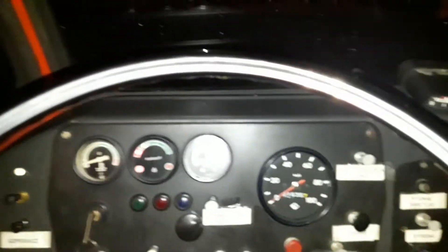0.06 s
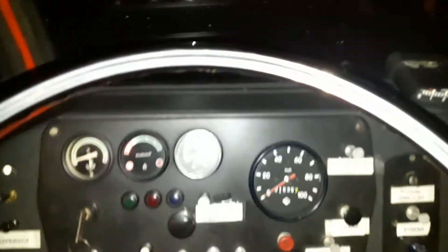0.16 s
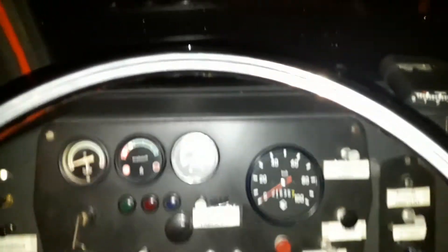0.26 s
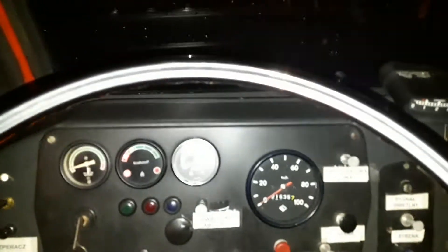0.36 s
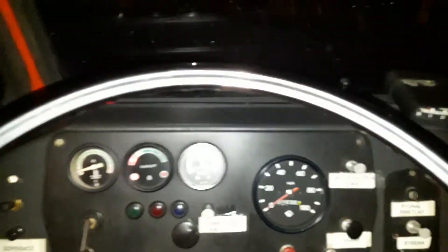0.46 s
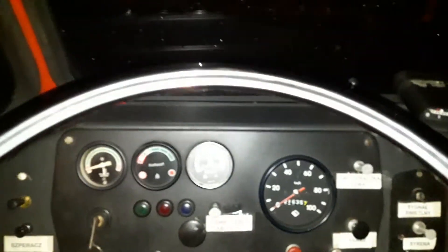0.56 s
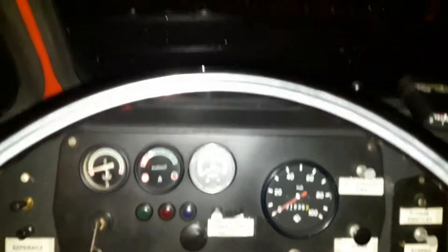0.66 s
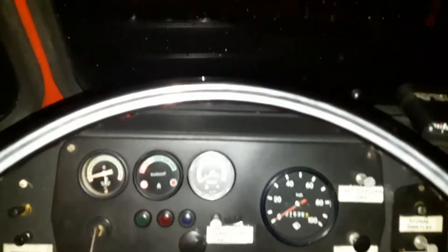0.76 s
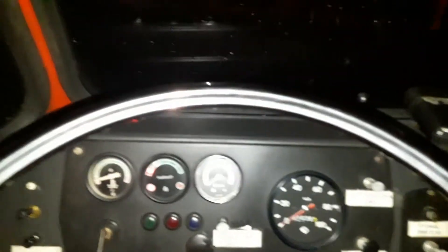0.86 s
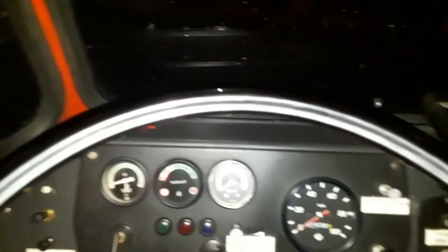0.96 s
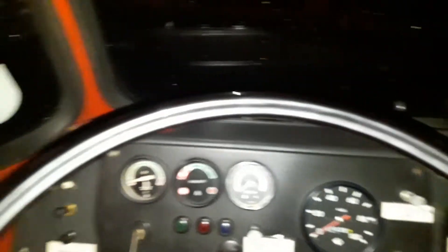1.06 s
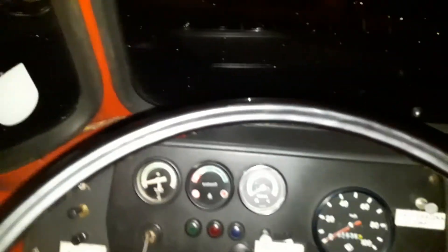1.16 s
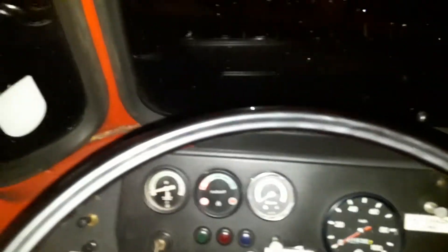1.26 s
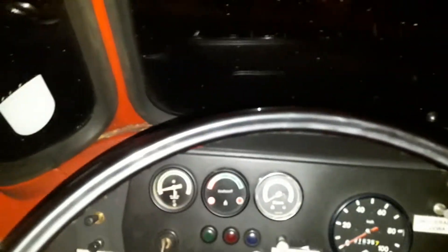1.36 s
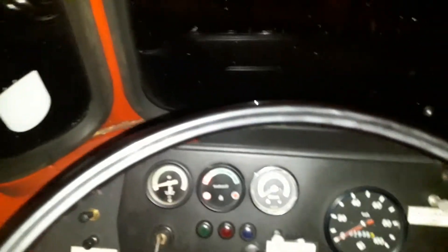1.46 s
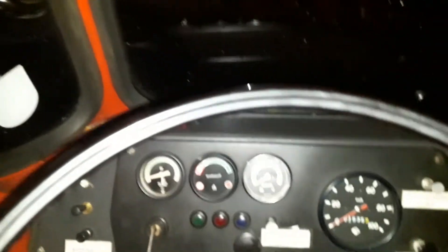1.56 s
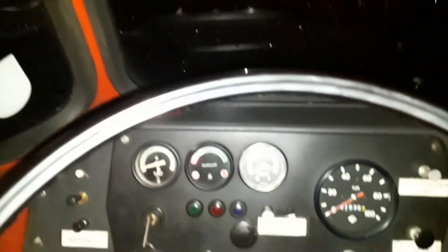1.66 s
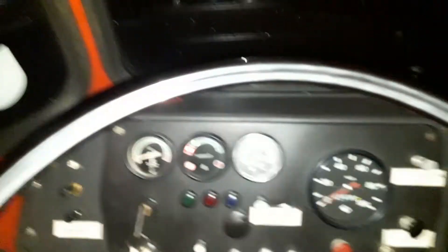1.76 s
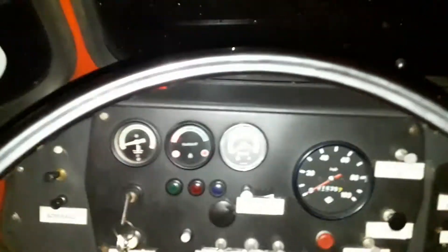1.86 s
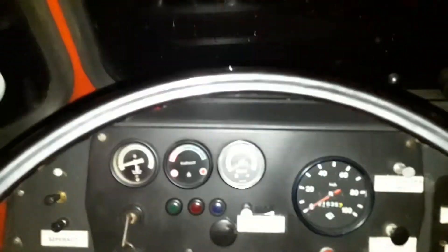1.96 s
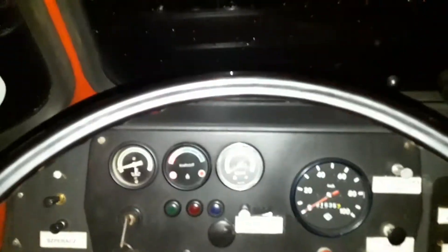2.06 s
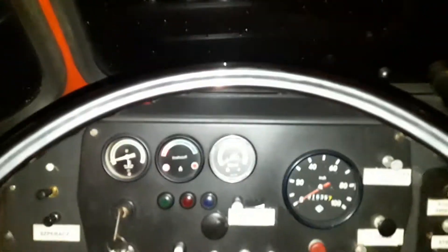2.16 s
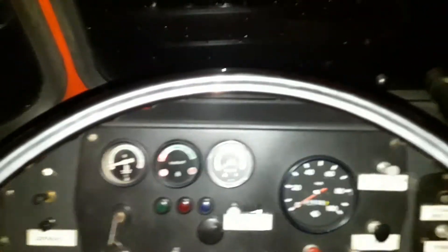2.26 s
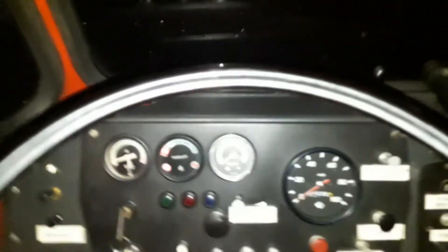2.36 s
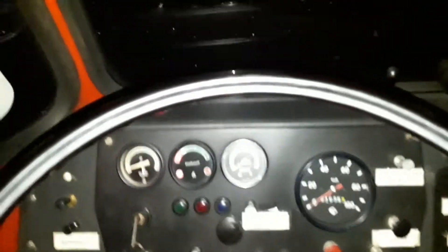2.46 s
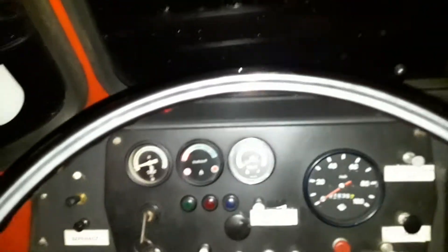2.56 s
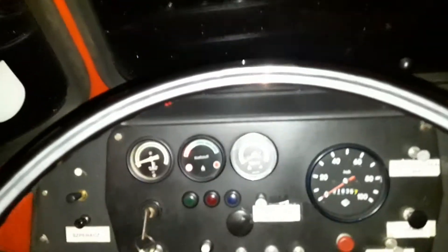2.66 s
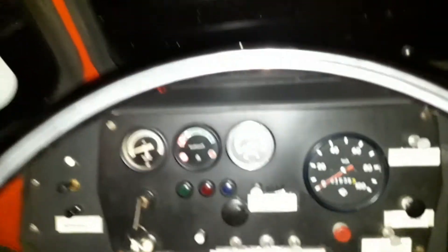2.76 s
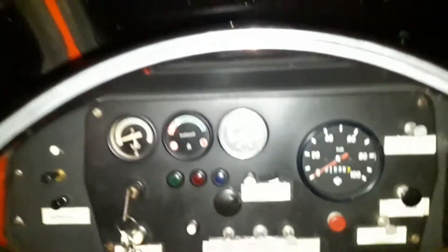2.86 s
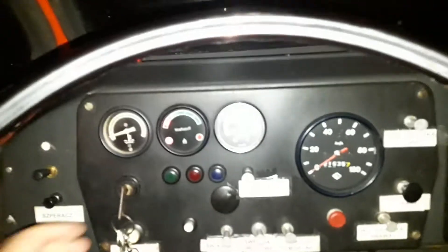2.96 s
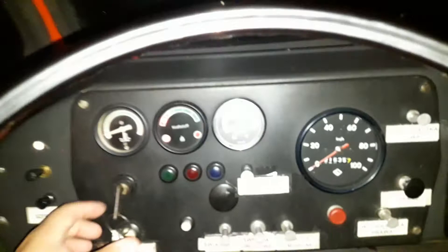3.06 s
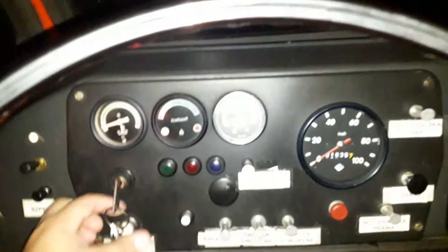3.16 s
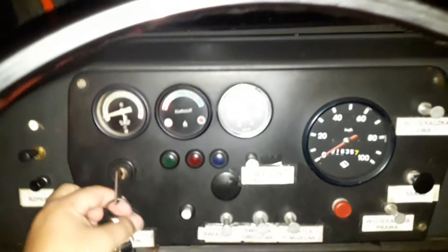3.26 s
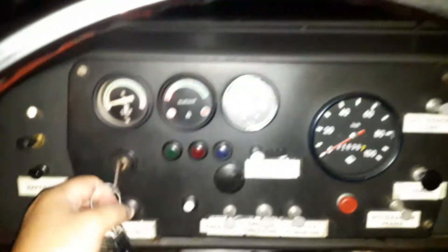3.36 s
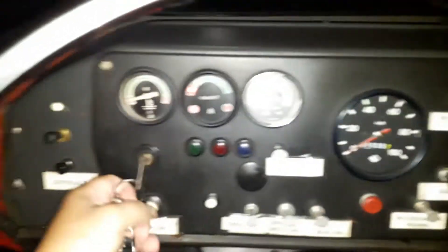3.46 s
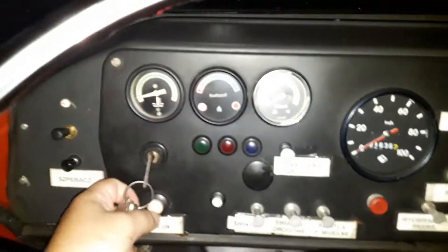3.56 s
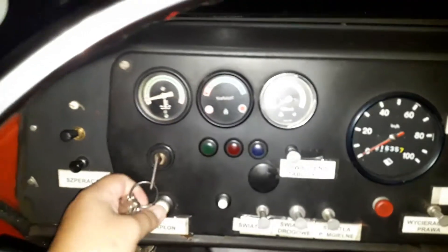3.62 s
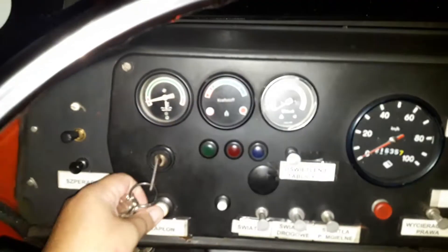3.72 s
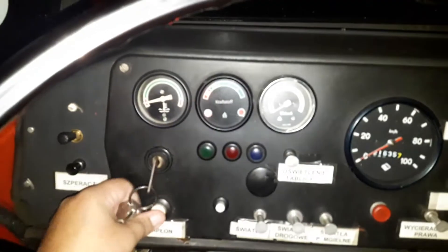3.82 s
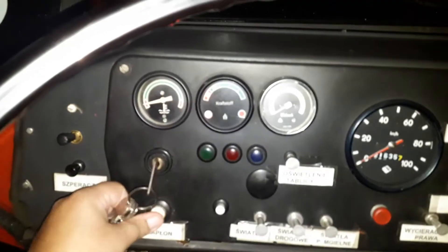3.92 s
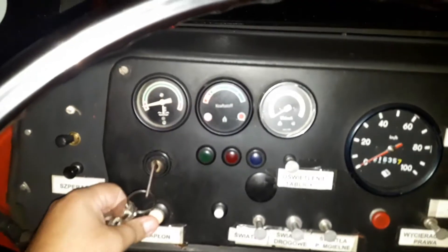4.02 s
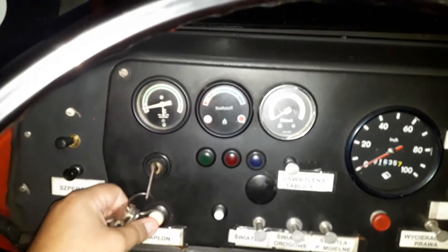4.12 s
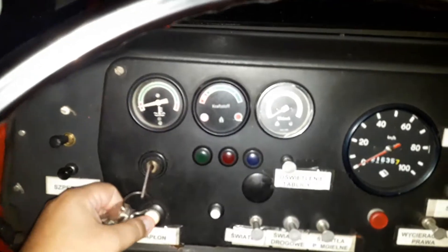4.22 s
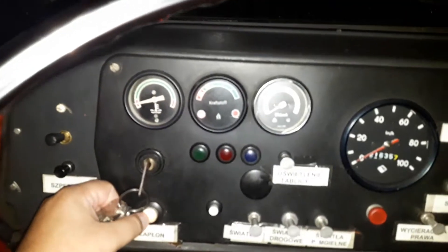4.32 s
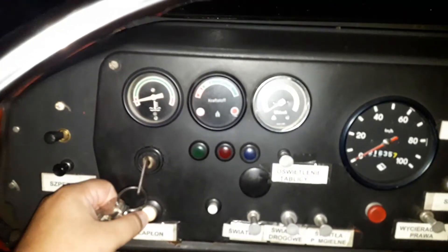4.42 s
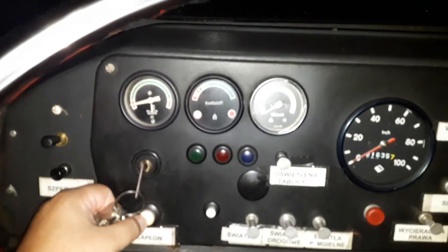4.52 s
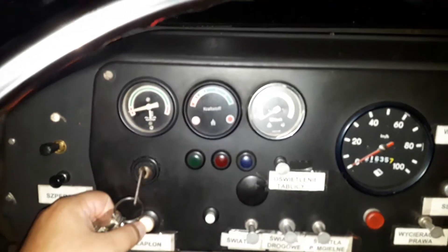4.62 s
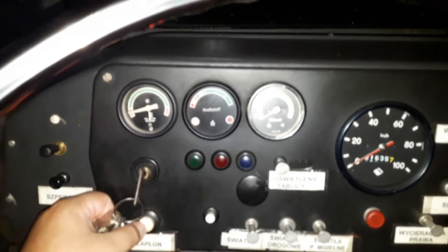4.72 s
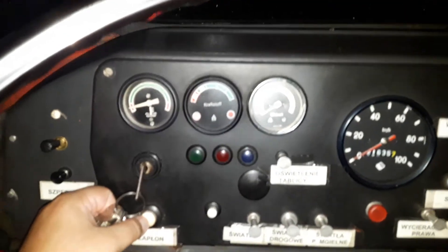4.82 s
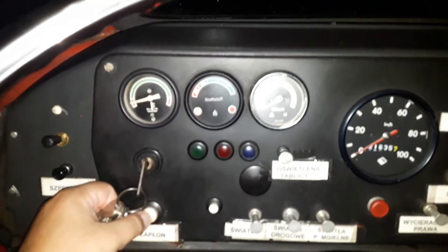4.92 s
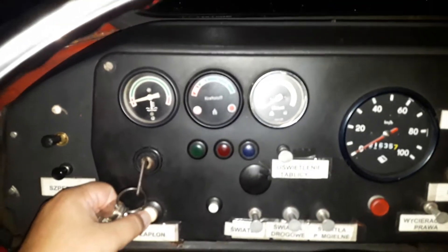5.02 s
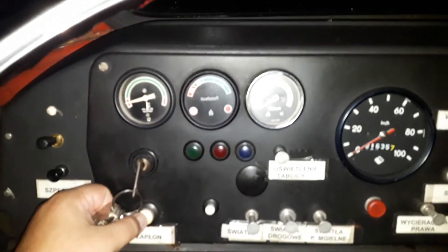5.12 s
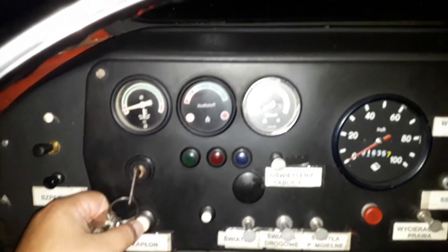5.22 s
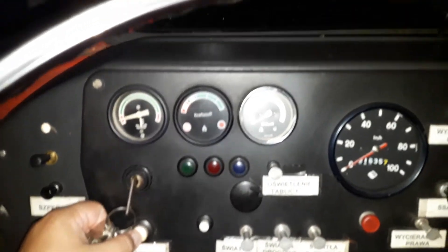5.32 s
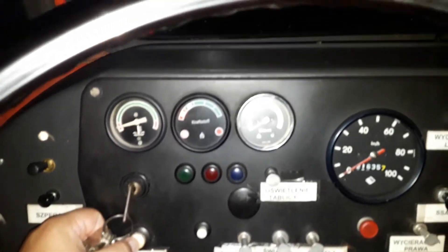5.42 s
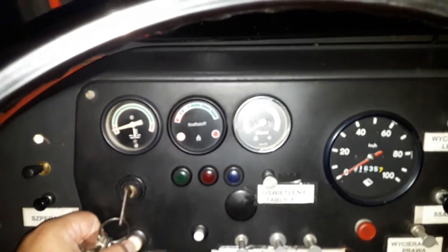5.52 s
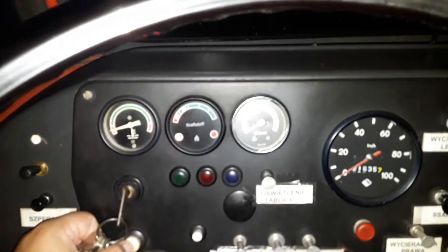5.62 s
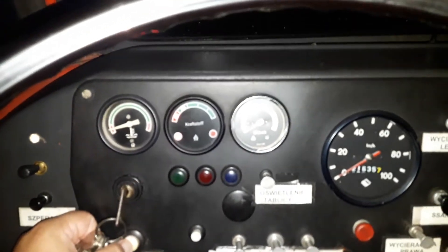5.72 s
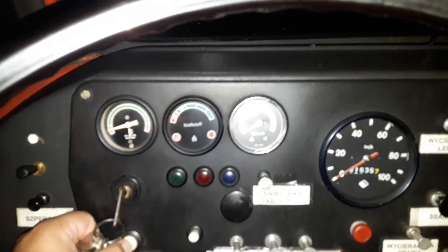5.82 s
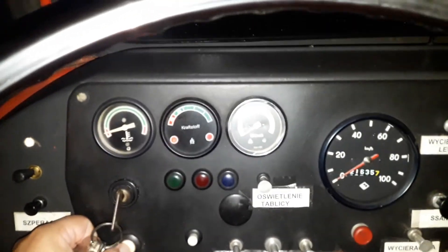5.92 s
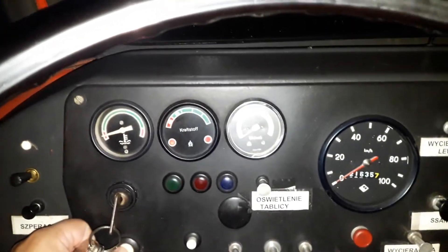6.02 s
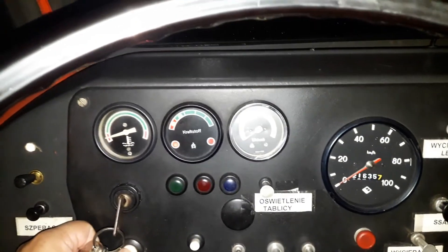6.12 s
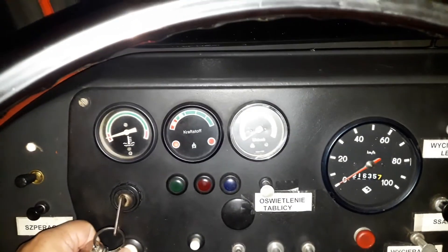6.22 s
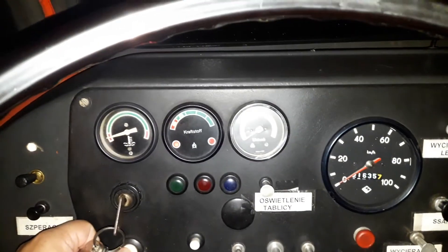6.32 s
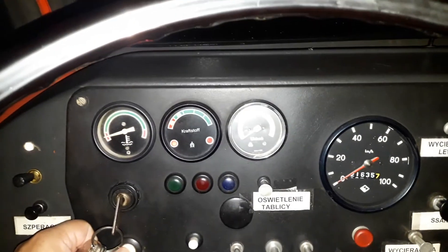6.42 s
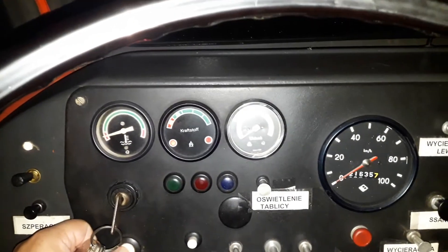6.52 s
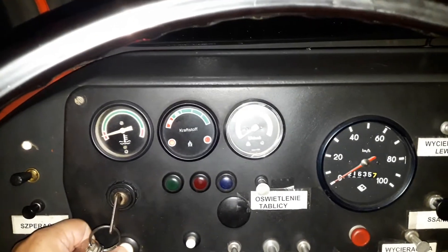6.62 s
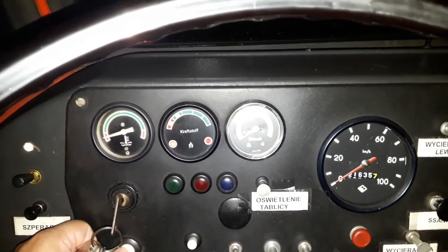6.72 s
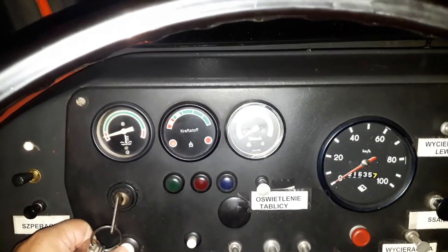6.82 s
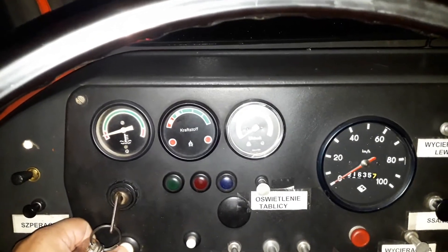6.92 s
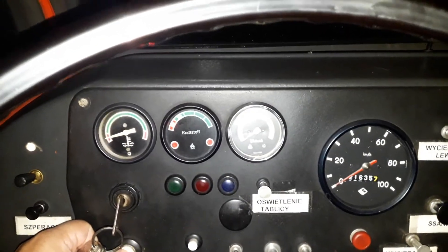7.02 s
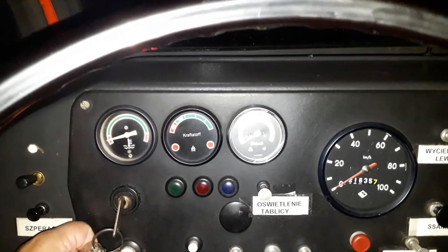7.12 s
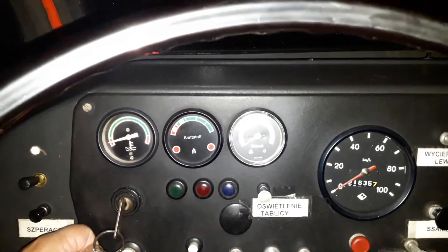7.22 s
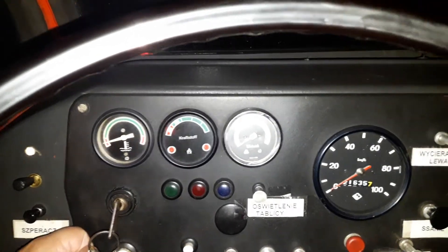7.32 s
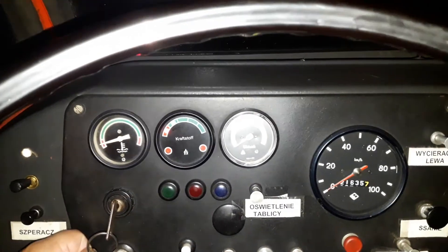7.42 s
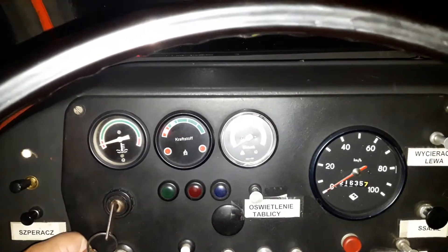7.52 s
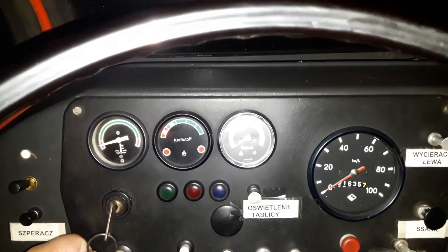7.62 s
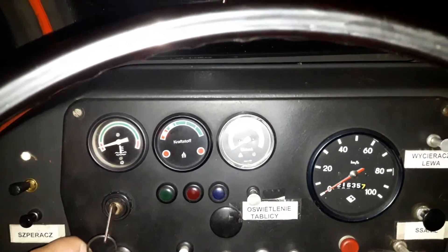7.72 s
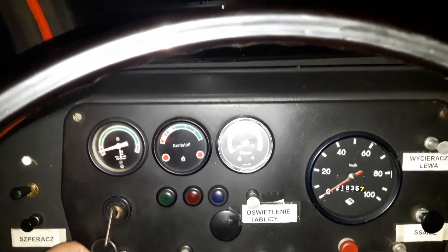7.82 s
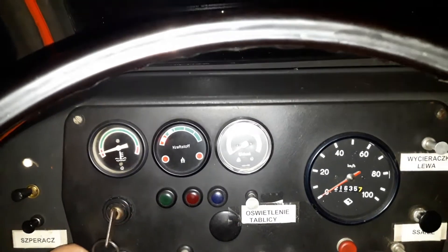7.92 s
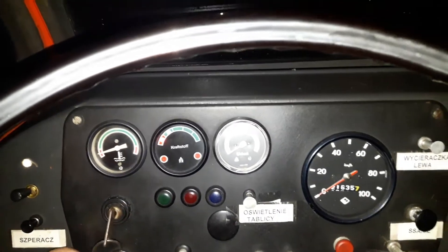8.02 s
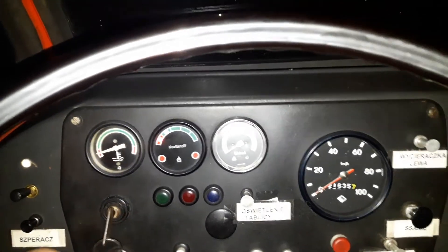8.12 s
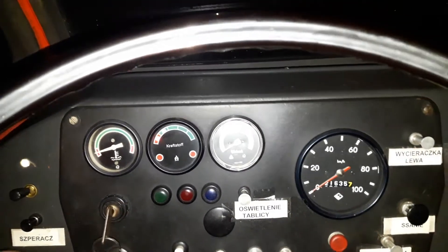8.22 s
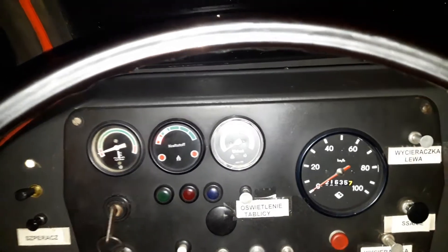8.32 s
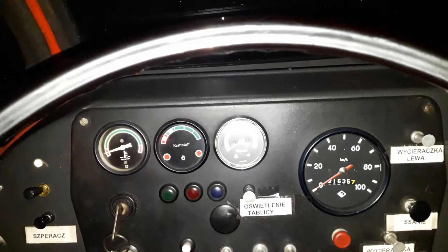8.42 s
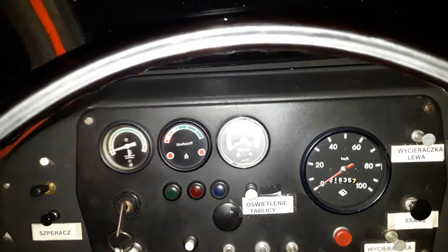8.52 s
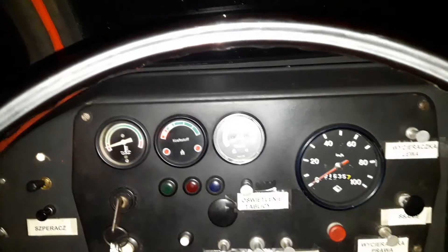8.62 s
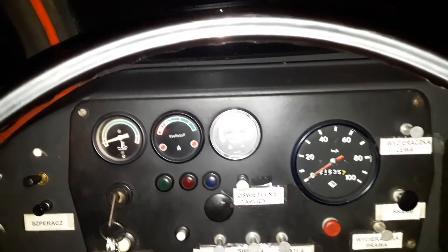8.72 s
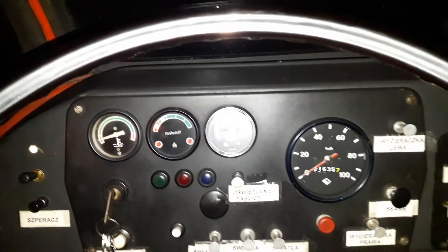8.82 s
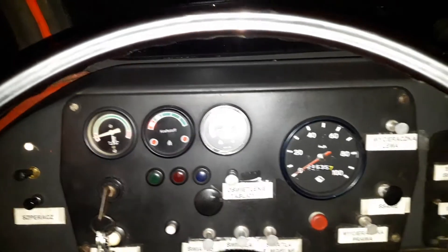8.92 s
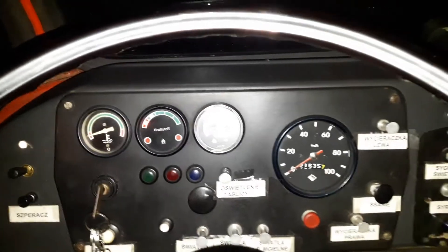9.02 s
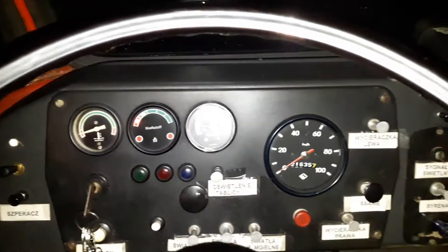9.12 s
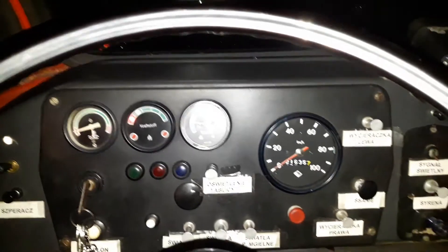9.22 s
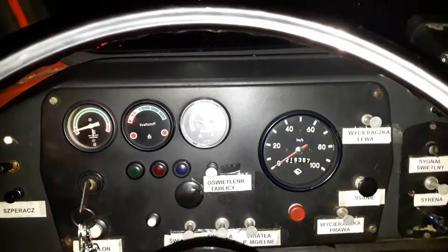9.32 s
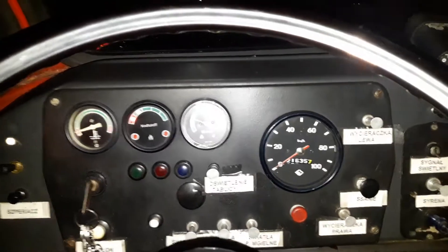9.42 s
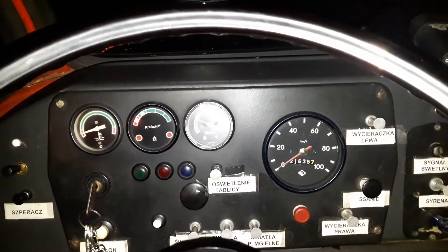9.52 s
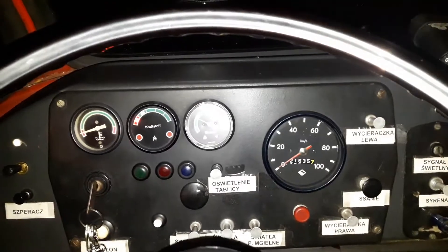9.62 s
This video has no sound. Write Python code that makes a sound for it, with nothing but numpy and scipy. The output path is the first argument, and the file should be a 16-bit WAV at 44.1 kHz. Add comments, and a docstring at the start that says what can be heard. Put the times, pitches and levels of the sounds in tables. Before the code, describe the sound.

Fingers tick on the microphone and keys jingle inside a truck cab, then the starter cranks and the engine catches and idles unevenly.

```python
"""Fingers tick and rub on a hand-held camera, right at the microphone, inside a truck cab in a garage.
Close by a latch clacks, trim creaks and a bunch of keys jingles. Beyond the bulkhead the starter clunks
in and cranks, and an air-cooled V8 catches, knocks about once a turn and hunts around its idle speed.
Blows are short rattles through ringing bodies; clatter, gears and cooling air are shaped noise;
the exhaust is firing pulses and turbulence booming in cab and garage."""
import sys
import numpy as np
from scipy import signal
from scipy.fft import rfft, irfft, next_fast_len
from scipy.io import wavfile
from scipy.ndimage import uniform_filter1d

SR = 44100
rng = np.random.default_rng(int(sys.argv[2]) if len(sys.argv) > 2 else 0)


def generate_wav(signal):
    """Clip the signal to [-1, 1] and save it as 16-bit WAV at the path in sys.argv[1]."""
    frames = np.transpose(np.atleast_2d(signal))
    scaled = np.clip(frames, -1, 1) * 32767
    pcm = np.round(scaled).astype(np.int16)
    wavfile.write(sys.argv[1], SR, pcm)


N = 426437

# The engine from the cab. Each row: time in seconds, clatter level in dB, exhaust level in dB.
ENGINE_LEVELS = [(6.41, -51, -48), (6.47, -31, -37), (6.54, -34, -37.5), (6.63, -30, -34), (6.82, -26, -28),
                 (6.98, -23, -24), (7.1, -20, -22), (7.22, -24, -24), (7.38, -29, -30.5),
                 (7.56, -25.5, -32.5), (7.71, -24, -27.5), (7.83, -22, -28), (8.01, -27.5, -29),
                 (8.17, -27.5, -30), (8.58, -24.5, -31.5), (9.15, -23.5, -31.5), (9.42, -24.5, -31),
                 (9.54, -27.5, -30), (9.67, -29, -31.5)]
# Its hunting speed. Each row: time in seconds, firings a second.
FIRING_RATE = [(6.6, 37), (6.82, 47), (6.98, 44.3), (7.13, 36), (7.4, 34.5), (7.6, 33.5), (7.9, 38),
               (8.1, 34), (8.27, 32.5), (8.5, 34.5), (8.8, 38), (9.0, 40), (9.2, 41.5), (9.36, 41.2),
               (9.67, 35)]
# Hard firings. Each row: start in seconds, middle and treble level in dB.
KNOCKS = [(6.54, -49, -51), (6.62, -40, -48), (6.68, -34, -44), (6.788, -17.5, -19), (6.9, -18.5, -22.5),
          (6.98, -35, -27), (7.065, -19.5, -21), (7.153, -25, -27), (7.5, -27, -40), (7.623, -22.5, -29.5),
          (7.694, -27, -30.5), (7.735, -22.5, -31), (7.97, -28.5, -34), (8.295, -26.5, -34),
          (8.41, -20, -30.5), (8.545, -25.5, -41), (8.64, -25.5, -33), (8.74, -23, -28),
          (8.842, -17.5, -26.5), (8.945, -21.5, -38), (9.04, -18.5, -26.5), (9.14, -22, -28.5),
          (9.25, -23.5, -27.5), (9.58, -26.5, -36)]
# Puffs at the intake as the first cylinders catch. Each row: start in seconds, low band level in dB.
INTAKE_PUFFS = [(6.45, -41.5), (6.54, -42.5), (6.62, -42), (6.68, -37.5), (6.73, -39), (6.78, -30.5),
                (6.85, -40), (6.895, -34)]

# Blows, far to near. Each row: start in seconds, low, middle and treble level in dB, rise and t60 in
# seconds.
STARTER_CLUNKS = [(5.8, -50, -33, -37.5, 0.052, 0.42), (5.835, -17.5, -21.5, -30.5, 0.023, 0.52)]
PINION_SQUEAK = [(6.44, -50, -25, -55, .014, .22)]
LATCH_CLACKS = [(1.001, -36, -43, -34.5, 0.00085, 0.47), (1.015, -57, -54, -57, 0.0035, 0.17),
                (1.03, -52, -41.5, -53, 0.004, 0.25), (1.05, -67, -41.5, -61, 0.0025, 0.53)]
TRIM_CREAKS = [(1.228, -51.5, -41, -51.5, 0.032, 0.48), (1.358, -89, -62, -59.5, 0.0089, 0.36),
               (1.46, -83, -64, -83, 0.04, 1), (2.15, -45.5, -70, -85, 0.017, 0.32),
               (3.54, -57.5, -63.5, -52.5, 0.015, 0.62), (3.63, -85, -63, -80, 0.04, 1),
               (3.815, -80, -61.5, -80, 0.02, 0.44), (5.755, -59, -74, -75, 0.028, 0.1)]
KEY_CHIMES = [(7.185, -70, -36, -60, .015, 0.44), (7.975, -70, -34, -60, 0.01, 0.31)]
# Keys colliding. Each row: start in seconds, low, middle and treble level in dB, t60 in seconds.
KEY_JINGLES = [(3.257, -58, -55.5, -80, .35), (3.284, -62.5, -49.5, -59, .44),
               (3.353, -50, -45.5, -67.5, .4), (3.428, -65, -34.5, -38, .14),
               (3.444, -54.5, -35.5, -40, .32), (3.474, -68.5, -38.5, -45, .24),
               (3.491, -56, -29.5, -34.5, .23), (3.528, -49, -20, -24.5, .045),
               (3.538, -46.5, -29, -35.5, .22), (3.56, -52, -45.5, -53.5, .34), (3.81, -60, -52, -65, .51),
               (5.755, -80, -60, -84, .7), (8.068, -60, -40, -33, .3)]

# Ticks on the camera case. Each row: start in seconds, thump, snap and fizz level in dB, thump in Hz.
CASE_TICKS = [(0.2423, -42, -54, -55, 425), (0.2492, -21.5, -21.5, -27, 244), (0.2732, -21, -19, -33, 232),
              (0.286, -36, -46, -50, 487), (0.291, -29, -48, -36, 487), (0.295, -36, -20, -31, 465),
              (1.7509, -34, -35, -28, 250), (1.83, -38, -46, -58, 167), (1.868, -26, -55, -66, 124),
              (1.8997, -21.5, -26, -42, 250), (2.1108, -26, -35, -38, 223), (2.1184, -26, -34, -55, 178),
              (2.311, -29, -52, -48, 458), (2.3296, -28, -39, -40.5, 571), (2.338, -33.5, -33, -32, 554),
              (2.3407, -14, -43.5, -43, 468), (2.415, -40, -61, -46, 199), (2.8721, -50, -45.5, -55, 533)]
# Strokes on the case. Each row: start and length in seconds, level in dB, place of the peak from 0 to 1,
# share of cloth from 0 to 1.
CASE_RUBS = [(0.233, 0.017, -50.5, 0.9, 0.7), (0.253, .014, -54, .2, 0.5), (0.264, 0.036, -52, 0.9, 0.3),
             (0.298, 0.095, -60, .05, 0.3), (1.756, 0.068, -48, 0.54, 0.25), (1.811, 0.098, -60, 0.15, 0.3),
             (1.901, 0.098, -43, 0.67, 0.07), (1.979, .1, -59, 0.36, 0.3), (2.11, 0.13, -51, 0.12, 0.18),
             (2.255, 0.09, -56.5, 0.2, 0.7), (2.3, 0.055, -52.5, 0.8, .6), (2.344, .25, -53, 0, .7),
             (2.872, 0.45, -60, 0.45, 0.77)]
# Case rumble from the shifting grip and from jolts. Each row: time in seconds, level in dB.
GRIP_LEVELS = [(0.0, -70), (0.5, -73), (0.9, -84), (1.2, -67), (1.65, -75.5), (2.0, -62), (2.5, -71),
               (2.8, -68), (3.6, -68), (4.1, -83)]
JOLT_PEAKS = [(0.299, -39.5), (1.07, -46), (1.83, -43), (1.89, -49), (2.121, -33), (2.349, -35),
              (2.42, -52), (2.9, -44.5)]

# The colour of each source at the microphone. Each row: frequency in Hz, relative level in dB.
BLOCK_TONE = [(150, -29), (250, -2), (296, -6), (335, -4.5), (429, -3), (886, 0), (957, -4), (1150, -1.5),
              (2240, -5.5), (2490, -4.5), (4410, -7), (7570, -15.5), (10000, -37.5), (13000, -39.5),
              (22000, -120)]
PIPE_TONE = [(26, -30), (45, -21.5), (60, 1.5), (107, 2.5), (162, 4.5), (208, -2.5), (249, -7),
             (296, -15.5), (500, -10), (650, -35.5), (1100, -120)]
HISS_TONE = [(4120, -16), (7000, -1), (7820, -13), (9260, -8.5), (12600, -17), (15100, -10.5), (16000, -20)]
HOUSING_TONE = [(24, -40), (40, -24), (167, 3), (249, -9), (570, -12.5), (697, -8.5), (831, -12.5),
                (5870, -26), (16000, -57)]
GEAR_TONE = [(210, -28), (350, -5), (530, -10), (719, -4), (830, -8.5), (1360, -13), (1730, -11.5),
             (2540, -9.5), (3150, -14.5), (3700, -23), (4380, -24), (16000, -71)]
FRAME_TONE = [(18, -38), (30, -13), (86, 2.5), (135, -6), (172, 1), (268, -4), (400, -9.5), (520, -26),
              (880, -120)]
KEY_TONE = [(590, -62.5), (1000, -32), (1630, -29), (2030, -12.5), (2740, -27), (3010, -28), (4520, -23),
            (5380, 3.5), (8850, -17), (12800, -25.5), (14100, -9), (16000, -12.5)]
LATCH_TONE = [(59, -29), (100, 7.5), (189, -5), (308, -40), (365, -3), (801, -26.5), (1280, -11),
              (2170, -13.5), (3400, -16.5), (3700, -19), (3940, -20.5), (9020, -24.5), (16000, -68)]
TRIM_TONE = [(120, -62.5), (200, -36), (393, -2.5), (658, -24), (1120, -29), (1180, -12), (1600, 6.5),
             (2630, -21.5), (7930, -16), (14000, -50)]
SKIN_TONE = [(180, -31), (300, 3), (470, 2), (537, -5), (930, 0), (1340, -7), (2610, -1), (3520, -3),
             (4090, -1.5), (8220, -13), (15000, -23), (16000, -22.5)]
CLOTH_TONE = [(710, -43.5), (1200, -8.5), (1630, 13), (2270, -51.5), (3050, -27.5), (4860, 16), (7490, 16),
              (9000, -0.5), (10800, -30.5), (16000, -29)]
GRIP_TONE = [(12, -31), (25, -12), (70, 3), (202, 3), (300, -6.5), (584, -10.5), (912, -17.5), (1200, -22),
             (1560, -47.5), (2640, -120)]
GARAGE_TONE = [(12, -55), (20, -17), (65, -9), (96, 1), (120, -1), (285, -21), (310, -14.5), (624, -23),
               (1030, -23), (2750, -24.5), (3070, -24), (14300, -36), (16000, -37.5)]

# Resonances on those colours. Each row: centre in Hz, width in Hz, lift in dB.
BLOCK_PEAKS = [(345, 14, 6), (473, 19, 3), (698, 43, 0), (893, 14, 3), (1128, 13, 5), (1410, 25, 3.5),
               (1760, 125, 3.5), (2108, 19, 4.5), (2461, 30, 9), (2861, 24, 9), (3400, 17, 8),
               (3510, 19, 3.5), (4278, 16, 6.5), (4380, 13, 4), (4510, 24, 2.5)]  # castings and cab panels
ROOM_BOOMS = [(89.1, 8.7, 6.5), (115.6, 12, 5.5), (155.2, 15, -1.5), (167, 26, 4), (261, 6.1, 2)]  # air modes of cab and garage
GEAR_PEAKS = [(703, 69, 5), (1126, 28, 8.5), (1737, 33, 12), (2170, 80, 4), (2490, 57, 4), (2920, 60, 6)]
CASE_PEAK = [(2680, 340, 3.5)]

# The ring of struck parts. Each row: frequency in Hz, relative level in dB, t60 in seconds.
CYLINDER_HEAD_MODES = [(1148, -7, 0.088), (1666, 17, 0.014), (2466, 0, 0.15), (2870, 8, 0.11),
                       (3490, 6.5, 0.099), (4270, 4.5, 0.08), (5264, 6, 0.037)]
HOUSING_MODES = [(86.4, 6, 0.069), (140, 1, 0.16), (187, 5.5, 0.075), (358, -7.5, 0.11), (493, -16, .08),
                 (727, -9, 0.1), (915, -10, .05), (2090, -4.5, 0.039)]
PINION_MODES = [(1147, -3, .09), (1195, 0, .05)]
KEY_BUNCH_MODES = [(2050, -14, 0.02), (5150, 2, 0.02), (5620, -5.5, 0.0099), (6600, -4, 0.019),
                   (7830, -9, .04), (8200, -6.5, .03), (10410, -8, 0.023), (11200, -12.5, 0.021),
                   (13300, -14, .02), (14200, -1, .02), (14500, 2, .02), (14600, -2.5, 0.023)]
SINGLE_KEY_MODES = [(7680, 1, 0.082), (8420, -13, 0.069), (9100, -14, .04)]
LATCH_MODES = [(400, -2, .04), (1300, -3, .03), (1640, 0, .03), (2428, 1, .05), (2789, -8, .04),
               (3612, -3, .06), (5373, -8, .03), (5950, -14, .03), (7710, -15, .03), (8936, -13, .03)]
TRIM_MODES = [(424, -2, 0.035), (470, -1, 0.035), (1230, -1.5, 0.0585), (1450, -5, .06), (1710, -9.5, .05),
              (2040, 4.5, 0.028)]


def engine_clatter():
    """Beyond the bulkhead the running engine rattles its castings and the cab panels."""
    return noise_bed(ENGINE_LEVELS, BLOCK_TONE, 0.4, 0.0077, BLOCK_PEAKS, patchy_db=1.28)


def engine_knocks():
    """Hard firings ring the cylinder heads, about once a crank turn."""
    rise_s, t60_s = 0.011, 0.24
    rows = [(s, middle - 9, middle, treble, rise_s, t60_s) for s, middle, treble in KNOCKS]
    return blows(rows, CYLINDER_HEAD_MODES, BLOCK_TONE, (2100, 4400), ring=0.26, lumpy_db=1.5)


def exhaust():
    """Uneven pulses and turbulence in the pipe, the firing tone in the cab and a faint belt-driven hum."""
    tone_db, hum_db, waver_db, hum_per_firing = -40, -43, 3, 6.7
    cylinder_db = np.array([0, -2, -1, -3, 0, -2, -1.5, -1])
    t = np.arange(N) / SR
    firings = np.cumsum(np.interp(t, *np.transpose(FIRING_RATE))) / SR
    fired = np.flatnonzero(np.diff(np.floor(firings)))
    scatter_db = 1.2 * rng.standard_normal(N)[:len(fired)]
    pulses = np.zeros(N)
    pulses[fired] = amp(np.resize(cylinder_db, len(fired)) + scatter_db)
    pipe = coloured(0.8 * unit_rms(pulses) + rng.standard_normal(N), PIPE_TONE, ROOM_BOOMS)
    times, _, pipe_db = np.transpose(ENGINE_LEVELS)
    pipe *= amp(np.interp(t, times, pipe_db, left=-99))
    waver = waver_db * wander(N, 0.1)
    tone = amp(tone_db + waver) * np.sin(2 * np.pi * firings)
    hum = amp(hum_db + waver[::-1]) * np.sin(2 * np.pi * hum_per_firing * firings)
    fade_in = np.clip((t - FIRING_RATE[0][0]) / 0.2, 0, 1)
    return pipe + np.sqrt(2) * fade_in * (tone + hum)


def engine_air():
    """The intake puffs as the engine catches; once the fan turns, its hiss follows the clatter."""
    fan_up_s, rise_db_per_s = 6.55, 150
    times, clatter_db, _ = np.transpose(ENGINE_LEVELS)
    fan_db = -46.5 + 1.2 * (clatter_db + 24) + rise_db_per_s * np.minimum(times - fan_up_s, 0)
    fan = noise_bed(np.c_[times, fan_db], HISS_TONE, 0.6, 0.0087, patchy_db=2)
    upper_db, rise_s, t60_s = -54, 0.016, 0.15
    puffs = [(s, low_db, upper_db, upper_db, rise_s, t60_s) for s, low_db in INTAKE_PUFFS]
    return fan + blows(puffs, [], HISS_TONE, (8900, 10800), ring=0, lumpy_db=-1.5)


def starter_pinion():
    """The pinion slams into the ring gear, and squeaks as it is thrown out."""
    clunks = blows(STARTER_CLUNKS, HOUSING_MODES, HOUSING_TONE, (426, 1000), ring=0.93, lumpy_db=1)
    return clunks + blows(PINION_SQUEAK, PINION_MODES, GEAR_TONE, (700, 1500), ring=8, lumpy_db=2)


def cranking():
    """Gears and frame take a hard bite that settles; the gears then surge past each compression."""
    engage_s, catch_s, spin_up_db_per_s, growth_db_per_s = 5.85, 6.47, 533, 8
    surge_hz, surges_from_s, first_surge_s = 5.1, 6.04, 6.128
    t = np.arange(engage_s - 0.1, catch_s, 0.002)
    since = np.maximum(t - engage_s, 0)
    spin_up_db = spin_up_db_per_s * np.minimum(t - engage_s, 0)
    bite_db = 12.5 * np.exp(-(since / 0.036) ** 2)
    surge_db = 3.2 * np.cos(2 * np.pi * surge_hz * (np.maximum(t, surges_from_s) - first_surge_s))
    gear_db = -39 + spin_up_db + bite_db + surge_db + growth_db_per_s * since
    shudder_db = -42 + spin_up_db + 13.5 * np.exp(-since / 0.11)
    gears = noise_bed(np.c_[t, gear_db], GEAR_TONE, 0.69, 0.0032, GEAR_PEAKS, patchy_db=1.5)
    return gears + noise_bed(np.c_[t, shudder_db], FRAME_TONE, 0.9, 0.021)


def keys():
    """Near the microphone keys knock together; one dangling key chimes as the cab shakes."""
    rise_s = 0.0044
    rows = [(s, *levels_db, rise_s, t60) for s, *levels_db, t60 in KEY_JINGLES]
    bunch = blows(rows, KEY_BUNCH_MODES, KEY_TONE, (3450, 8800), ring=0.33, lumpy_db=0.5)
    return bunch + blows(KEY_CHIMES, SINGLE_KEY_MODES, KEY_TONE, (6500, 9900), ring=4, lumpy_db=2)


def latch():
    """A latch in the cab clacks and rings in four quick blows."""
    return blows(LATCH_CLACKS, LATCH_MODES, LATCH_TONE, (650, 2350), ring=0.62, lumpy_db=0.5)


def trim_creaks():
    """A trim panel or the seat creaks softly nearby."""
    return blows(TRIM_CREAKS, TRIM_MODES, TRIM_TONE, (700, 3000), ring=1.2, lumpy_db=1)


def finger_ticks():
    """The case snaps inward with a short fizz, then the microphone mount swings outward."""
    out, t = np.zeros(N), np.arange(2048) / SR
    fizz_band = signal.butter(2, [2800, 9000], "band", fs=SR, output="sos")
    fizz_decay = amp(-60 * t / 0.0036) + 0.044 * amp(-60 * t / 0.032)
    from_snap = t - 0.0004
    snap = 1.3 * (2 * (from_snap / 0.00019) ** 2 - 1) * np.exp(-(from_snap / 0.00014) ** 2)
    for start, thump_db, snap_db, fizz_db, hz in CASE_TICKS:
        fizz = 2 * signal.sosfilt(fizz_band, rng.standard_normal(len(t))) * fizz_decay
        thump = 2 * np.sin(2 * np.pi * hz * t) * np.exp(-520 * t) * np.minimum(1.4 * hz * t, 1)
        add(out, start, amp(thump_db) * thump + amp(snap_db) * snap + amp(fizz_db) * fizz)
    return out


def finger_rubs():
    """Skin and cloth slide on the plastic case; each stroke of friction swells and dies away."""
    out = np.zeros(N)
    for start, length, db, peak, cloth_share in CASE_RUBS:
        progress = np.linspace(0, 1, round(length * SR))
        peak = np.clip(peak, 0.02, 0.95)
        rise_db = -6 * np.maximum(1 - progress / peak, 0) ** 2
        fall_db = -22 * (np.maximum(progress - peak, 0) / (1 - peak)) ** 1.04
        friction = grainy(N // 20, 0.68, 0.0025)[:len(progress)]
        skin = np.sqrt(1 - cloth_share) * coloured(friction, SKIN_TONE, CASE_PEAK)
        cloth = np.sqrt(cloth_share) * coloured(friction[::-1], CLOTH_TONE)
        taper = signal.windows.tukey(len(progress), 0.06)
        add(out, start, amp(db + rise_db + fall_db) * taper * (skin + cloth))
    return out


def handling_rumble():
    """The restless hand rumbles in the camera case, with a short swell at each jolt."""
    rise_db_per_s, fall_db_per_s = 1100, 600
    t = np.arange(0, GRIP_LEVELS[-1][0], 0.002)
    level_db = np.interp(t, *np.transpose(GRIP_LEVELS))
    for s, db in JOLT_PEAKS:
        jolt_db = db - np.maximum(rise_db_per_s * (s - t), fall_db_per_s * (t - s))
        level_db = np.maximum(level_db, jolt_db)
    return noise_bed(np.c_[t, level_db], GRIP_TONE, 1.9, 0.0098)


def garage_air():
    """Faint room tone all round the cab."""
    return amp(-67) * coloured(grainy(N, 0.81, 0.038), GARAGE_TONE)


def blows(rows, modes, tone, splits_hz, ring, lumpy_db):
    """Each blow is a dying rattle of small contacts, heard directly and through the ringing body."""
    out, t = np.zeros(N), np.arange(SR // 3) / SR
    for start, *peaks_db, rise, t60 in rows:
        decay = amp(-60 * np.maximum(t - rise, 0) / t60)
        envelope = np.minimum(t / rise, 1) * decay * (1 - t / t[-1])
        rattle = grainy(len(t), lumpy_db, 0.0051)
        sound = unit_rms(envelope * coloured(rattle, tone))
        if modes:
            gains = amp(3 * rng.standard_normal(len(modes)))  # every blow lands somewhere else
            body = sum(gain * amp(db - 60 * t / ring_s) * np.sin(2 * np.pi * hz * t)
                       for gain, (hz, db, ring_s) in zip(gains, modes))
            sound += ring * unit_rms(signal.fftconvolve(envelope ** 1.25 * rattle, body)[:len(t)])
        add(out, start, three_bands(sound, splits_hz, peaks_db))
    return out


def three_bands(x, splits_hz, peaks_db):
    """Sets the highest short-time level of the low, middle and treble bands."""
    out = np.zeros(len(x))
    for hz, kind, db in zip((splits_hz[0], splits_hz, splits_hz[1]), ("low", "band", "high"), peaks_db):
        band = signal.sosfilt(signal.butter(3, hz, kind, fs=SR, output="sos"), x)
        out += amp(db) * band / np.sqrt(uniform_filter1d(band ** 2, 200).max())
    return out


def noise_bed(rows, tone, lumpy_db, lump_s, peaks=(), patchy_db=0):
    """Coloured grainy noise riding a level curve; each row opens with seconds and dB."""
    out = np.zeros(N)
    times, levels_db = np.transpose(rows)[:2]
    t = np.arange(times[0], times[-1], 1 / SR)
    fade_in = np.minimum(np.arange(len(t)) / 600, 1)
    level = amp(np.interp(t, times, levels_db)) * fade_in
    noise = coloured(grainy(len(t) + SR // 4, lumpy_db, lump_s), tone, peaks)
    add(out, times[0], level * patchy(noise, patchy_db)[:len(t)])
    return out


def patchy(x, depth_db):
    """Narrow patches of the spectrum swell and fade at random, giving the noise a slight shimmer."""
    spectra = signal.stft(x, nperseg=1024)[2]
    drift = uniform_filter1d(rng.standard_normal(spectra.shape[::-1]), size=6, axis=0)
    patches = unit_rms(uniform_filter1d(drift, size=3, axis=1)).T
    return unit_rms(signal.istft(spectra * amp(depth_db * patches), nperseg=1024)[1][:len(x)])


def coloured(x, tone, peaks=()):
    """Gives x a spectrum with resonances standing out of it, at rms 1."""
    size = next_fast_len(len(x))
    hz = np.fft.rfftfreq(size, 1 / SR)
    tone_hz, tone_db = np.transpose(tone)
    gain = amp(np.interp(np.log(hz + 1), np.log(tone_hz + 1), tone_db))
    for centre, width, lift_db in peaks:
        gain *= 1 + (amp(lift_db) - 1) / (1 + (2 * (hz - centre) / width) ** 2)
    return unit_rms(irfft(rfft(x, size) * gain, size)[:len(x)])


def grainy(size, lumpy_db, lump_s):
    """Noise whose level wanders in lumps."""
    return amp(lumpy_db * wander(size, lump_s)) * rng.standard_normal(size)


def wander(size, smooth_s):
    """Smoothed random drift at rms 1."""
    return unit_rms(uniform_filter1d(rng.standard_normal(size), int(smooth_s * SR)))


def amp(db):
    """Decibels to gain."""
    return 10 ** (np.asarray(db) / 20)


def unit_rms(x):
    """Scales to rms 1."""
    return x / np.sqrt(np.mean(x ** 2) + 1e-20)


def add(mix, start_s, sound):
    """Mixes a sound in at a time."""
    part = mix[round(start_s * SR):][:len(sound)]
    part += sound[:len(part)]


def scene():
    """One microphone in the cab: still air, hands and keys close by, the engine beyond the bulkhead."""
    air = garage_air()
    hands = finger_ticks() + finger_rubs() + handling_rumble()
    cab = latch() + trim_creaks() + keys()
    starter = starter_pinion() + cranking()
    engine = engine_clatter() + engine_air() + engine_knocks() + exhaust()
    return (air + hands + cab + starter + engine)[None]


def record(dry):
    """The camera's microphone loses the deepest bass, and its band ends at 16 kHz."""
    thinned = signal.sosfilt(signal.butter(2, 24, "high", fs=SR, output="sos"), dry)
    band_limit = signal.firwin(511, 16000, window=("kaiser", 9), fs=SR)
    return signal.oaconvolve(thinned, band_limit[None], "same")


dry = scene()
out = record(dry)
generate_wav(out)
```